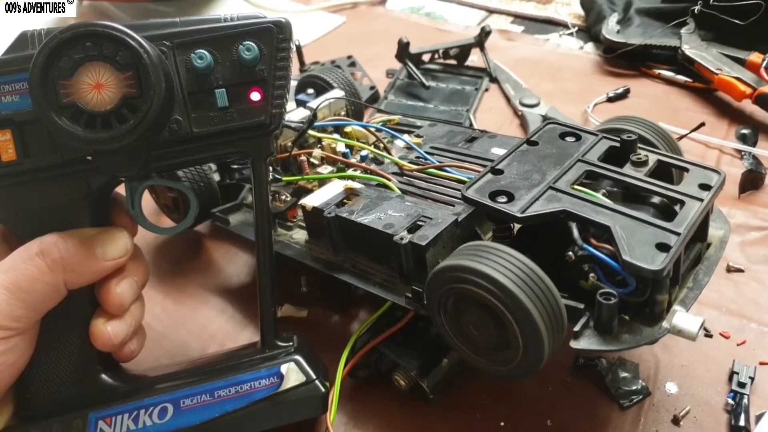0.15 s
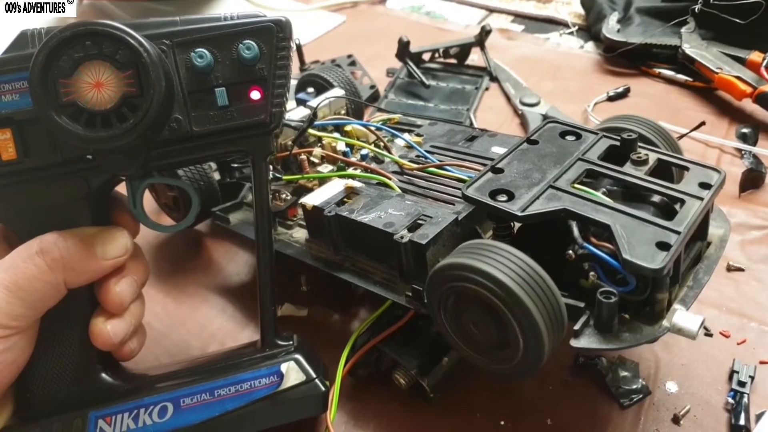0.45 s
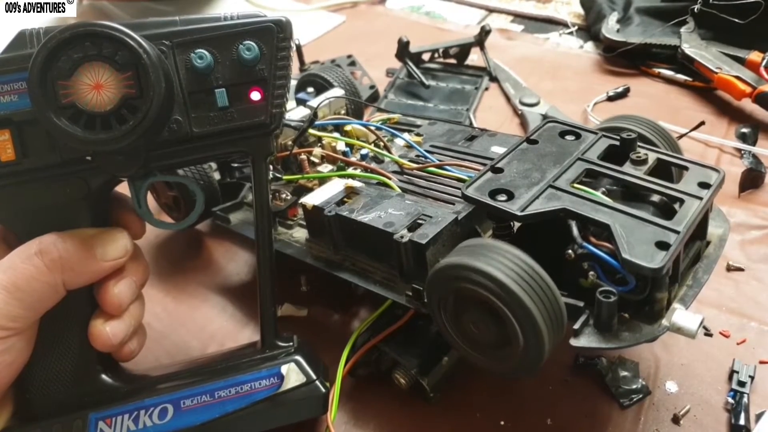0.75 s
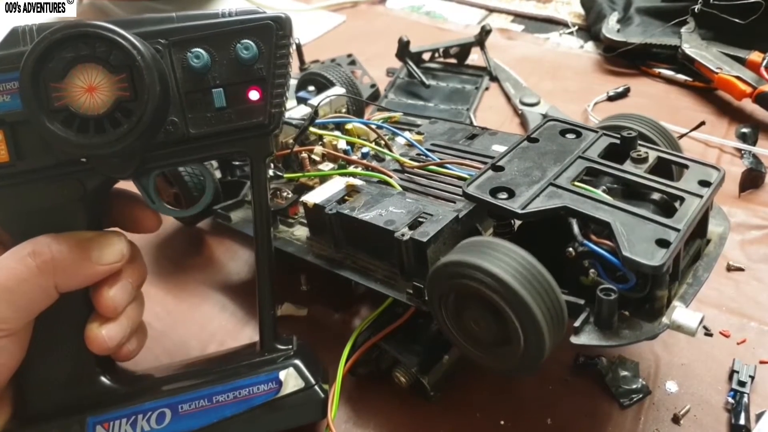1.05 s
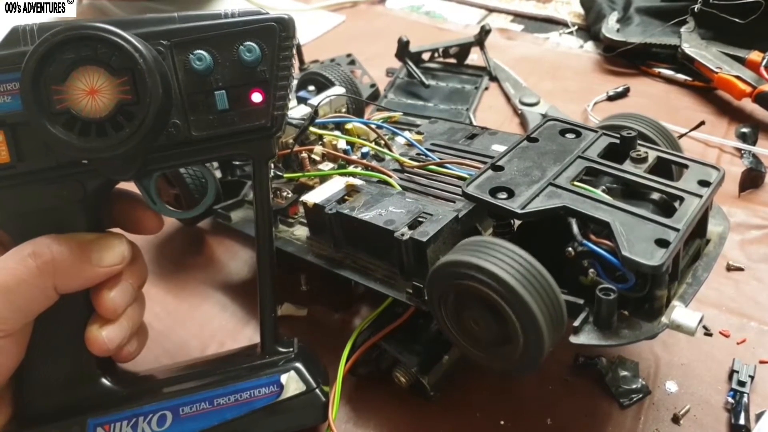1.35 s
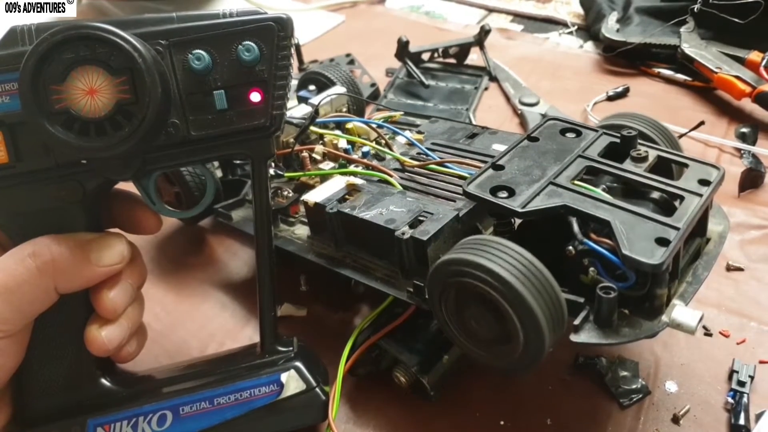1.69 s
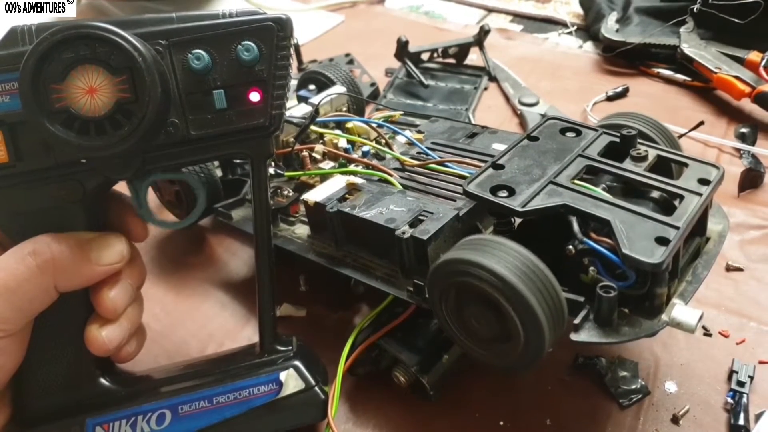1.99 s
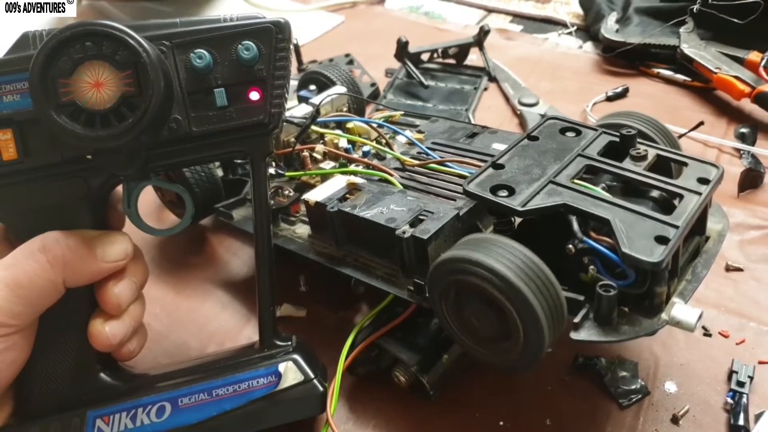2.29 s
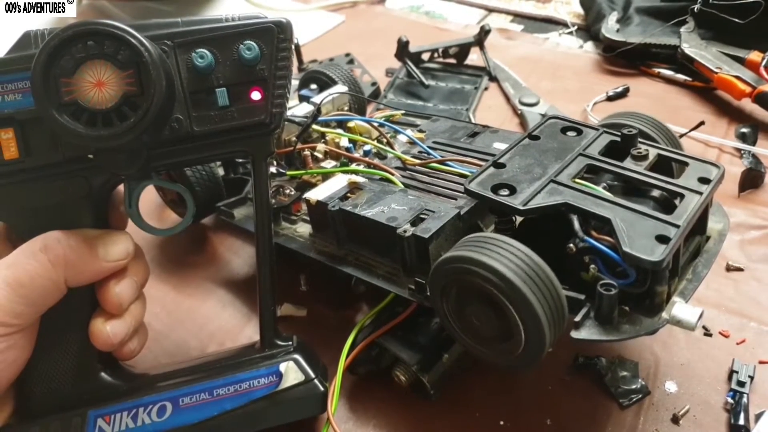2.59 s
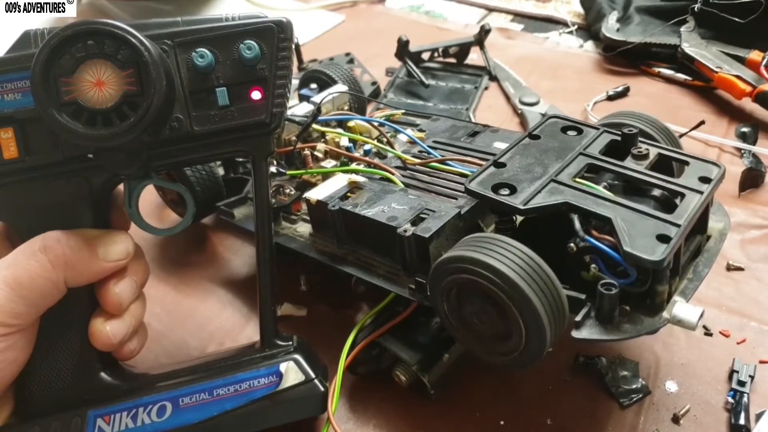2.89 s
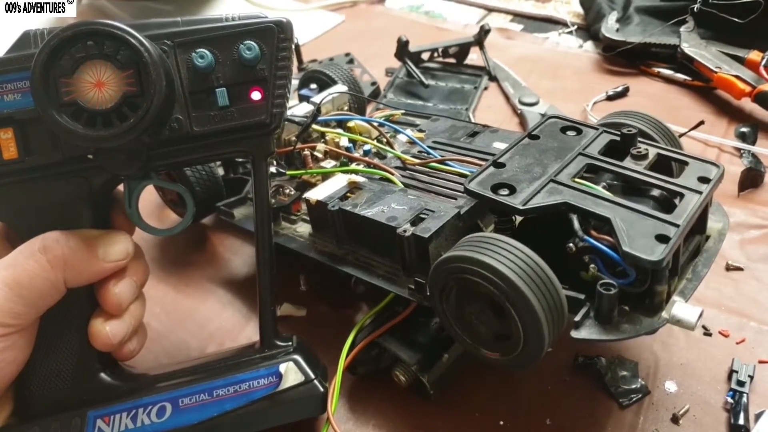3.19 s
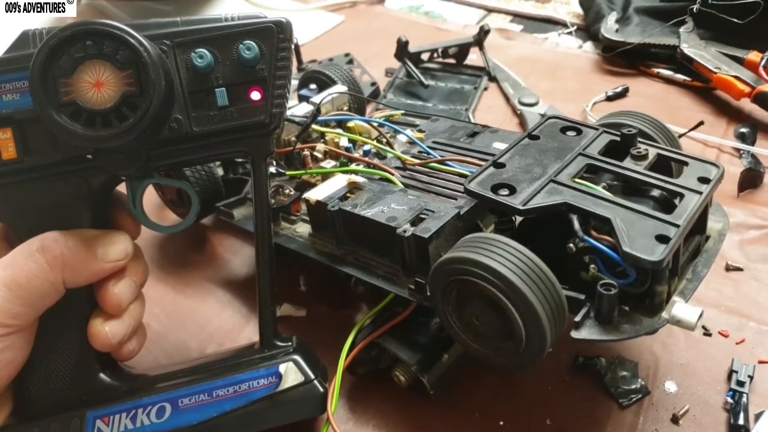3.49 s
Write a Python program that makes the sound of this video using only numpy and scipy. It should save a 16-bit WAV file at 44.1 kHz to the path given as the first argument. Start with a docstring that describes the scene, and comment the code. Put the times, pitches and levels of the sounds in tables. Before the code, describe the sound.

A toy car's small electric motor whines through rattling plastic gears, heard close in a small room. It runs at part speed, rises in pitch between 0.5 and 1 second, then holds. From about 2.2 seconds it coasts down, falling in pitch and fading, with light clacks from the loose gears. It almost stops near 3.4 seconds, then starts again at 3.5 with a few quick clicks.

```python
"""Toy car on a workbench

Close by, a toy car's brushed motor drives its plastic gearbox and free wheels. It runs at part
throttle, speeds up, coasts almost to a stop and is started again. Loose gear teeth rattle the
chassis, slack in the gears clacks and the shaft adds a whine. The bench rumbles faintly and a
small room echoes the rattle."""
import sys
import numpy as np
from scipy import signal
from scipy.fft import rfft, irfft, next_fast_len
from scipy.io import wavfile
from scipy.ndimage import uniform_filter1d, map_coordinates

SR = 44100
rng = np.random.default_rng(int(sys.argv[2]) if len(sys.argv) > 2 else 0)


def dump_mix(stems):
    """Bounce the given channels to the path in sys.argv[1] as a 16-bit WAV at rate SR."""
    frames = np.atleast_2d(stems).T  # one column per channel
    limited = np.clip(frames, -1, 1)  # hard clip at full scale
    pcm = np.round(limited * 32767).astype(np.int16)
    wavfile.write(sys.argv[1], SR, pcm)


N = 160965


def gearbox(speed, force_db):
    """Rattling teeth, clacks and the shaft's whine all sound through the chassis."""
    turns = np.cumsum(speed) / SR
    slowness = 1 - speed / speed.max()  # 0 at top speed, 1 at rest
    push = amp(force_db + uneven_meshing_db(turns, slowness))
    rattle = push * shifting_bands(tooth_strikes(speed, slowness))
    impacts = amp(4.5) * (rattle + clacks())
    whine = amp(force_db) * shaft_whine(turns, speed, slowness)
    return changing_tone(chassis(impacts + whine), speed)


def tooth_strikes(speed, slowness, teeth_per_turn=24, contact_points=12):
    """Teeth hit at uneven moments with uneven force. Each contact point favours its own pitch range."""
    passed = np.cumsum(speed) * teeth_per_turn / SR
    count = int(passed[-1])
    timing, strength, direction = rng.standard_normal((N // 2, 3))[:count].T
    at = np.clip(np.searchsorted(passed, np.arange(count) + timing), 0, N - 1)
    spread = np.log(amp(4.1 + 1.1 * slowness[at]))  # slow gears hit less evenly
    size = np.exp(spread * np.clip(strength, -2.5, 2.5) - spread ** 2)
    size = size * np.sign(direction) / np.sqrt(speed[at])
    centres_hz, width_octaves = np.geomspace(990, 11950, contact_points), 0.64

    def pitch_ranges(hz):
        octaves_away = np.log2((hz + 1) / centres_hz[:, None])
        share = 1 / (1 + (octaves_away / width_octaves) ** 2) ** 2
        return np.sqrt(share / share.sum(axis=0))
    clicks = [np.bincount(at[k::contact_points], size[k::contact_points], N)
              for k in range(contact_points)]
    strikes = filtered(np.array(clicks), pitch_ranges)
    # The load shifts between the contact points, so each one wavers in level.
    return unit(sum(ring_and_echo(x * amp(0.65 * wobble(29.5))) for x in strikes))


def uneven_meshing_db(turns, slowness, gear_ratio=10, bind_s=2.948):
    """The big gear binds and the small one presses once per turn of each, most clearly when slow."""
    big_gear_turns = (turns - turns[round(bind_s * SR)]) / gear_ratio
    big_gear_db = slowness * np.cos(2 * np.pi * big_gear_turns)
    small_gear_db = 1.5 * slowness * np.cos(2 * np.pi * turns)
    flutter_db = 0.97 * wobble(95.6)
    return big_gear_db + small_gear_db + flutter_db


def shifting_bands(x, depth_db=2.5, width_hz=130, life_s=0.05):
    """Narrow pitch bands of the rattle rise and sink at random."""
    bands = signal.stft(x, nperseg=1024, noverlap=768)[2]
    hz = np.arange(bands.shape[1]) * SR / 1024
    seconds = np.arange(bands.shape[2]) * 256 / SR
    grid = np.meshgrid(hz / width_hz, seconds / life_s, indexing='ij')
    drift = [map_coordinates(rng.standard_normal((256, 256)), grid, order=2, mode='wrap') for _ in x]
    bands = bands * amp(depth_db * np.array(drift))
    return unit(signal.istft(bands, nperseg=1024, noverlap=768)[1][:, :N])


def clacks(decay_s=0.0036):
    """While slowing and restarting, the slack in the gears closes with short bursts of contacts."""
    # The clacks. Each row: start in seconds, relative level in dB.
    bursts = [(2.33, -16), (2.378, -14), (2.453, -17), (2.612, -16), (2.706, -27), (2.818, -27.5),
              (2.873, -24.5), (2.888, -23.5), (2.944, -22), (2.952, -29), (3.062, -28), (3.121, -33),
              (3.379, -37), (3.509, -26.5), (3.535, -27), (3.552, -28), (3.571, -27), (3.6, -28),
              (3.638, -18.5), (3.643, -22)]
    t = np.arange(N) / SR
    power = sum(amp(2 * db) * (t >= start) * np.exp(-np.abs(t - start) / decay_s)
                for start, db in bursts)
    return amp(-1.5) * np.sqrt(power) * rng.standard_normal((2, N))


def shaft_whine(turns, speed, slowness, rasp_hz=110):
    """Tones at multiples of the shaft speed flutter, rasp and pass through the motor mount."""
    # The tones. Each row: multiple of the shaft speed, relative level in dB.
    tones = [(1, -4), (2, -16), (3, -23), (4, -24.5), (5, -20.5), (6, -27), (7, -27)]
    # The lowest two hum only at speed. Each row: shaft turns per second, added level in dB.
    hum = [(250, -16), (278, -11.5), (298, -2.5), (345, -3.5), (380, 2), (392, 0.5)]
    # Peaks and dips of the mount. Each row: pitch in Hz, width in Hz, gain in dB.
    mount_modes = [(1037, 27, -1.5), (1253, 81, 6.5), (1898, 34, 9.5), (2230, 30, -36), (2496, 71, 24)]
    angle = turns + 0.037 * wobble(24.9)  # the shaft jitters slightly
    hum_db = along(hum, speed)
    roughness = 0.2 + 2.2 * slowness
    whine = 0
    for multiple, db in tones:
        level = amp(db + hum_db * (round(multiple) <= 2) + 0.4 * wobble(12))
        rasp = 1 + roughness * np.sqrt(multiple) * wobble(rasp_hz)
        rasp /= np.sqrt(1 + multiple * roughness ** 2)  # rougher, but no louder
        wave = np.sqrt(2) * np.sin(2 * np.pi * (round(multiple) * angle + rng.random()))
        whine = whine + level * rasp * wave
    return filtered(whine, lambda hz: resonator([(0, 0)], mount_modes, hz))


def chassis(shaking):
    """The plastic body boosts some pitches and swallows others, a little differently for each ear."""
    # Broad tone of the sound both ears share, and of the sound that differs between them.
    # Each row: pitch in Hz, gain in dB.
    shared_tone = [(30, -75), (150, -48), (240, -42), (320, -25.5), (400, -23.5), (560, -26), (700, -17),
                   (900, -7.5), (1500, -5), (2600, 0), (4000, 0.5), (5600, -2.5), (7000, -7), (8400, -14),
                   (12500, -13), (15500, -14.5)]
    side_tone = [(30, -80), (240, -46), (400, -37.5), (600, -26), (800, -24), (1100, -9), (1400, -7),
                 (1700, -5.5), (2900, -2.5), (3700, 1), (5200, 0), (6000, -3), (8200, -12.5), (12500, -13),
                 (15500, -14.5)]
    # Peaks and dips on those two. Each row: pitch in Hz, width in Hz, gain in dB.
    shared_modes = [(475, 58, 9.5), (1047, 32, 10), (1164, 34, 5.5), (1307, 51, 6.5), (1888, 24, 8.5),
                    (2276, 203, 4.5), (3302, 68, 3.5), (3555, 24, 10), (3490, 70, -6), (3930, 217, 5),
                    (4313, 53, -3.5), (4450, 163, 5), (4960, 140, -4.5), (5390, 390, 3.5),
                    (6310, 220, -4.5), (6590, 100, 5.5), (6800, 150, -11), (6920, 270, 6),
                    (12700, 630, 2.5)]
    side_modes = [(1760, 66, 10.5), (1956, 34, 10), (2100, 80, -3), (2370, 150, 6), (3100, 70, 3),
                  (3670, 190, 8.5), (3960, 100, 7.5), (4380, 200, -5), (4800, 180, 3), (5170, 250, 4),
                  (12600, 330, 5)]
    # Balance between the ears. Each row: pitch in Hz, left minus right in dB.
    balance = [(200, -1.5), (1000, 0.5), (2400, 0.1), (4400, -0.5), (8000, .5), (14000, 0.5)]
    shared = filtered(shaking[0], lambda hz: resonator(shared_tone, shared_modes, hz))
    side = filtered(shaking[1], lambda hz: resonator(side_tone, side_modes, hz))
    ears = np.array([shared + side, shared - side])
    return filtered(ears, lambda hz: amp(np.outer([0.5, -0.5], along(balance, hz))))


def changing_tone(x, speed, treble_hz=6750, bass_hz=670):
    """Gentle contacts are duller and let the gears ring.
    The bass lifts briefly as the car speeds up and stands out most as it slows."""
    # Treble from hard hits, and bass that outlasts the rattle. Each row: time in seconds, gain in dB.
    treble_db = [(0, -2.5), (.5, -1.2), (1.0, 0.1), (2.36, 0), (2.5, -2.5), (3.0, -4.5), (3.3, -11),
                 (3.47, -17), (3.5, -10), (3.51, -6), (3.53, -7), (3.59, 0), (3.65, 0.5)]
    bass_db = [(0, 7.5), (.4, -0.5), (.55, 3.5), (1.3, -2.5), (2.1, -0.5), (2.35, -5), (2.45, -1),
               (2.8, 3.5), (3.1, 5.5), (3.42, 13.5), (3.51, 13), (3.57, 9.5)]
    # The gears' own ring. Each row: pitch in Hz, width in Hz, share from 0 to 1.
    gear_modes = [(3830, 40, 0.3), (3910, 53, 0.3), (4007, 56, 1), (4340, 100, 0.34)]
    treble = filtered(x, lambda hz: 1 - 1 / (1 + (hz / treble_hz) ** 4))
    bass = filtered(x, lambda hz: 1 / (1 + (hz / bass_hz) ** 4))
    ring = filtered(x, lambda hz: sum(share / (1 + 2j * (hz - pitch) / width)
                                      for pitch, width, share in gear_modes))
    ring_db = 6.5 * np.clip((290 - speed) / 150, 0, 1)  # grows below 290 turns per second
    changes = [(treble, curve(treble_db)), (bass, curve(bass_db)), (ring, ring_db)]
    return x + sum(band * (amp(db) - 1) for band, db in changes)


def ring_and_echo(x, ring_s=0.017, room_s=0.24, room_db=-4.5):
    """A hit rings briefly in the plastic and echoes round the room, along two random paths."""
    t = np.arange(SR // 4 + 1) / SR
    ring, room = rng.standard_normal((2, 2, len(t)))
    ring = unit(ring * amp(-60 * t / ring_s))
    room = amp(room_db) * unit(room * amp(-60 * t / room_s))
    spectrum = rfft(ring + room)
    broad_tone = np.sqrt(np.abs(uniform_filter1d(np.abs(spectrum) ** 2, 21)) + 1e-12)
    paths = irfft(spectrum / broad_tone)[:, :SR // 5]  # favours neither bass nor treble
    return signal.fftconvolve(x[None], paths, axes=1)[:, :N]


def bench_rumble(force_db, peak_db=-58.5):
    """The bench shakes more as the gears rattle harder."""
    # Tone of the rumble. Each row: pitch in Hz, relative level in dB.
    spectrum = [(25, -15), (40, -4), (70, -10.5), (125, 1), (170, -6.5), (230, -7.5), (400, -8),
                (1000, -60)]
    return amp(peak_db + force_db - force_db.max()) * noise(spectrum)


def room_tone(level_db=-58):
    """The room has a faint, steady hush."""
    # Tone of the hush. Each row: pitch in Hz, relative level in dB.
    spectrum = [(25, -18), (80, -3.5), (150, -2), (240, -16), (350, -10), (480, 6), (700, 3), (1200, -2.5),
                (15000, -17)]
    return amp(level_db) * noise(spectrum)


def amp(db):
    """Turn decibels into a number to multiply by."""
    return 10 ** (np.asarray(db) / 20)


def unit(x):
    """Scale a sound to an average (rms) level of 1."""
    return x / np.sqrt(np.mean(x ** 2) + 1e-20)


def along(points, hz):
    """Read between (Hz, value) rows, with octaves evenly spaced."""
    pitches, values = np.transpose(points)
    return np.interp(np.log(hz + 1), np.log(pitches + 1), values)


def curve(rows):
    """Join (seconds, value) rows into one value per sample."""
    return np.interp(np.arange(N) / SR, *np.transpose(rows))


def wobble(rate):
    """A smooth curve through `rate` random values a second."""
    return map_coordinates(rng.standard_normal(N // 20), [np.arange(N) * rate / SR], mode='wrap')


def filtered(x, response):
    """Scale each pitch in a sound by response(hz)."""
    size = 2 * next_fast_len(N // 2 + SR // 4)
    return irfft(rfft(x, size) * response(np.fft.rfftfreq(size, 1 / SR)), size)[..., :N]


def resonator(spectrum, modes, hz):
    """How a solid part answers each pitch: a broad tone with narrow peaks and dips."""
    peaks_db = sum(db / (1 + (2 * (hz - pitch) / width) ** 2) for pitch, width, db in modes)
    cepstrum = irfft(np.log(amp(along(spectrum, hz) + peaks_db)))
    # Folding the second half onto the first makes it ring after a hit, never before.
    half = len(cepstrum) // 2
    cepstrum[1:half] *= 2
    cepstrum[half + 1:] = 0
    return np.exp(rfft(cepstrum))


def noise(spectrum):
    """Noise at level 1, shaped by (Hz, dB) rows."""
    return unit(filtered(rng.standard_normal(N), lambda hz: amp(along(spectrum, hz))))


def scene():
    """The gearbox plays over the shaken bench and the quiet room."""
    # Motor speed. Each row: time in seconds, shaft turns per second.
    motor_speed = [(0, 252), (.3, 266), (.5, 281), (.7, 316), (.9, 361), (1.0, 374), (1.12, 381),
                   (1.42, 387), (1.67, 386), (1.9, 391), (2.16, 392), (2.23, 366), (2.3, 328), (2.42, 275),
                   (2.65, 205), (3.0, 128), (3.3, 78), (3.47, 40), (3.65, 200)]
    # Force of the rattle. Each row: time in seconds, relative level in dB.
    rattle_force = [(0, -19), (.15, -18.5), (.4, -19.5), (.65, -17.5), (.85, -17.5), (1.55, -18),
                    (2.08, -19.5), (2.23, -17.5), (2.38, -20.5), (2.5, -22.5), (2.8, -25.5), (2.99, -31.5),
                    (3.12, -32), (3.21, -36), (3.31, -37), (3.46, -48), (3.52, -37), (3.58, -28),
                    (3.65, -28)]
    force_db = curve(rattle_force)
    bench = bench_rumble(force_db)
    return gearbox(curve(motor_speed), force_db) + bench + room_tone()


def record(dry, top_hz=15600):
    """Cut away the very highest treble."""
    return filtered(dry, lambda hz: hz < top_hz)


dry = scene()
out = record(dry)
dump_mix(out)
```